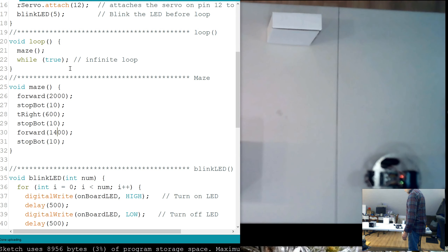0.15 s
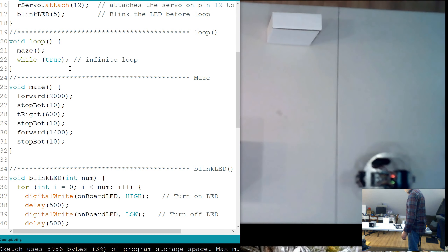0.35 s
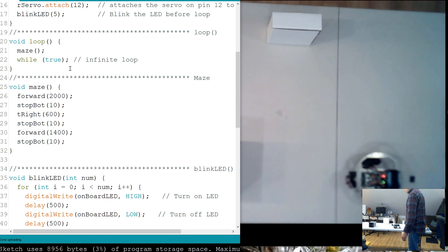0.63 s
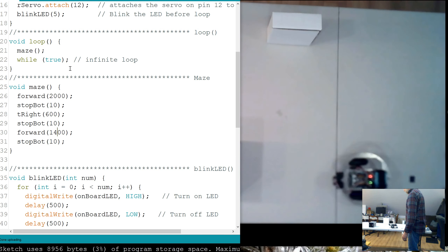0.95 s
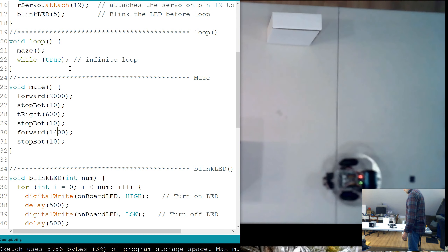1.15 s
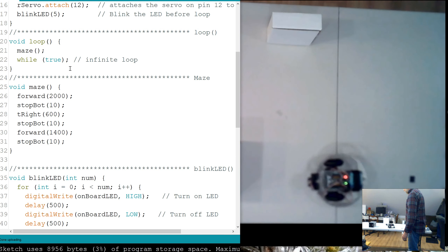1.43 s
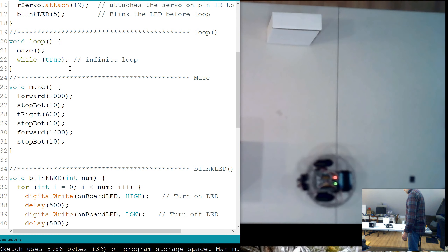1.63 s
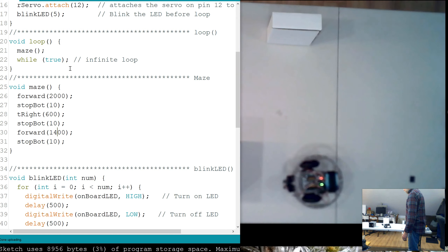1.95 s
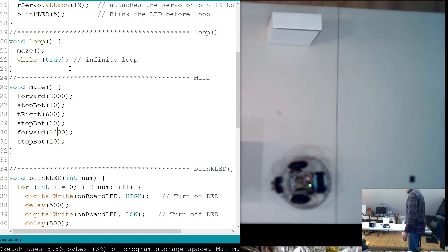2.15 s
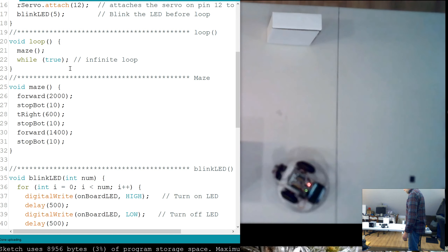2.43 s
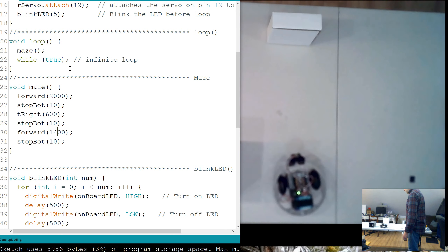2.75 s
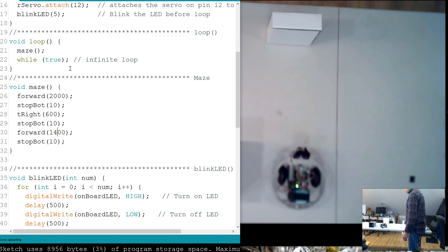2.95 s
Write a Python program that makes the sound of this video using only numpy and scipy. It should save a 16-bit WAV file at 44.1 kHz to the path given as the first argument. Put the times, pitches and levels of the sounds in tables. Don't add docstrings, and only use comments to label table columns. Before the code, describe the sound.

After a quiet moment, a small robot's servo motors start a buzzy, rattling whir, run steadily, dip briefly, then resume while turning. Soft low wheel thuds and faint squeaks lie underneath, in a quiet room, one microphone.

```python
import sys
import numpy as np
from scipy import signal
from scipy.fft import rfft, irfft
from scipy.io import wavfile
from scipy.ndimage import uniform_filter1d

SR = 44100
rng = np.random.default_rng(int(sys.argv[2]) if len(sys.argv) > 2 else 0)


def volts_from_decibels(level):
    exponent = np.asarray(level, float) / 20
    return 10 ** exponent


def persist_wave(psi):
    counts = np.round(np.clip(psi, -1, 1) * 32767).astype(np.int16)
    wavfile.write(sys.argv[1], SR, np.atleast_2d(counts).T)


N = 136710
TIME = np.arange(N) / SR


def evened(x):
    return x / np.sqrt(np.mean(x ** 2) + 1e-20)


def steady(x, size=2000):
    x = evened(x)
    power = abs(uniform_filter1d(x ** 2, size)) + .02
    return evened(x / power ** (0.72 / 2))


def curve(rows, col):
    rows = np.array(rows)
    return np.interp(TIME, rows[:, 0], rows[:, col])


def gate(start, length, rise, fall):
    t = TIME - start
    return np.clip(t / rise, 0, 1) * np.exp(-np.maximum(t - length, 0) / fall)


def slow(rate_hz):
    size = max(int(SR / rate_hz), 2)
    noise = rng.standard_normal(N)
    return evened(uniform_filter1d(uniform_filter1d(noise, size), size))


def clicks(per_s, spread_db):
    size = volts_from_decibels(spread_db * np.minimum(rng.exponential(1, N), 5)) * rng.choice([-1., 1.], N)
    return evened(size * (rng.random(N) < per_s / SR))


def colour(x, points):
    f, db = np.transpose(points)
    hz = np.fft.rfftfreq(N, 1 / SR) + 1
    gain_db = np.interp(np.log(hz), np.log(f), db, left=db[0] - 11, right=db[-1] - 1)
    return irfft(rfft(x) * volts_from_decibels(gain_db), N)


def ring(x, hz, width):
    r = np.exp(-np.pi * width / SR)
    poles = [1, -2 * r * np.cos(2 * np.pi * hz / SR), r * r]
    return signal.lfilter([1, 0, -1], poles, x) * np.sqrt((1 - r * r) / 2)


# (time [s], level [dB], brightness [dB], sizzle [dB])
DRIVE = [(.255, -83.5, 1, -1), (.29, -58.5, -1, 2), (.33, -47, -7, 0.5), (.42, -45.5, -1.5, 4.5),
         (.68, -44, -1, 0), (1.0, -44.5, -4, -0.5), (1.3, -47, -2.5, 0.5), (1.65, -46.5, 1, -2.5),
         (2.04, -45.5, -2, 0.5), (2.265, -47.5, -3, 2), (2.3, -58.5, -7, 3), (2.33, -48.5, -6, 1),
         (2.43, -45, -3.5, 3.5), (2.75, -48.5, -3, 4), (2.87, -45.5, -4, 2), (2.905, -50.5, 3, 0),
         (2.94, -47.5, 3, -2), (3.1, -46.5, -5.5, 3.5)]
# (start [s], length [s], lift [dB])
SURGES = [
    (0.647, 0.032, 2),
    (0.974, .06, 0.5),
    (1.437, 0.025, 2),
    (1.685, .07, 1.5),
    (1.997, 0.02, 2.5),
    (2.087, .02, 2.5),
]


def servos():
    switched_on = gate(DRIVE[0][0], N, 0.0075, 1)
    surge_db = sum(db * gate(start, length, .01, 0.007) for start, length, db in SURGES)
    effort = switched_on * volts_from_decibels(curve(DRIVE, 1) + surge_db - 4.0)
    return effort * (rattle() + whine(NEAR_MOTOR, 1) + whine(FAR_MOTOR, 2) + gearbox())


# (frequency [Hz], density [dB per Hz])
CASE = [(3900, -45), (4850, -14), (5750, 0.5), (6250, 4.5), (9000, 4.5), (11200, 8.5), (12300, -1.5),
        (15300, -13.5)]
# (frequency [Hz], level [dB])
CASE_MODES = [(5080, -19), (5310, -15.5), (6630, -15.5), (7410, -34), (7660, -16), (8180, -11.5),
              (9500, -10.5), (9800, -12.5), (10100, -10), (10450, -7.5), (10800, -14.5), (11200, -16.5),
              (14000, -30)]


def rattle():
    ticks = clicks(12000, 2.5)
    modes = sum(volts_from_decibels(db + 2.2 * slow(14)) * ring(ticks, hz, 70) for hz, db in CASE_MODES)
    case = volts_from_decibels(-1) * evened(colour(ticks, CASE)) + volts_from_decibels(-4.5) * modes
    hz, t, z = signal.stft(case, SR, nperseg=1024, noverlap=768)
    hz = hz[:, None]

    patches = uniform_filter1d(rng.standard_normal(z.shape), 2, 0)
    patches = evened(uniform_filter1d(patches, 22, 1))

    low_edge_hz, pivot_hz, sizzle_hz = 5300, 8300, 12300
    under_db = 4 / (1 + (hz / low_edge_hz) ** 60)
    slope = np.minimum(np.tanh(2 * np.log2((hz + 1) / pivot_hz)), .4) * (hz > low_edge_hz)
    tilt_db = slope * np.interp(t, TIME, curve(DRIVE, 2))
    sizzle_db = np.interp(t, TIME, curve(DRIVE, 3)) / (1 + (sizzle_hz / (hz + 1)) ** 16)

    gain = volts_from_decibels(2.5 * patches + tilt_db + sizzle_db - under_db)
    return signal.istft(z * gain, nperseg=1024, noverlap=768)[1][:N]


# (time [s], tooth mesh [Hz], whine [dB])
NEAR_MOTOR = [(.3, 1978, 1), (.44, 2000, 11), (.5, 2089, 6.5), (.57, 2120, 7.5), (.78, 2112, -2),
              (.9, 2175, -14), (1.8, 2190, -5), (2.0, 2187, 2.5), (2.28, 2195, 1), (2.33, 1694, 1.5),
              (2.41, 2090, 3), (2.6, 2150, -3), (2.85, 2233, 5.5), (2.89, 2215, 6), (2.91, 2026, -21),
              (2.95, 2060, 7.5), (3.1, 2140, -25)]
# (time [s], tooth mesh [Hz], whine [dB])
FAR_MOTOR = [
    (.28, 2010, -4),
    (.42, 2205, -12.5),
    (1.2, 2225, -3),
    (1.45, 2210, 2.5),
    (2.28, 2204, 2.5),
    (2.32, 1904, -10),
    (2.42, 2202, 3),
    (2.6, 2290, 5),
    (2.9, 2287, -5),
    (3.1, 2240, -10),
]
# (multiple, near motor [dB], far motor [dB])
OVERTONES = [(6, -26, -28), (3, -13, -11), (4, -10, -17), (5, -9, -18)]


def whine(motor, level_col):
    pinion_teeth, wander_hz, wobble_rad = 12, 10, .14
    cycles = np.cumsum(curve(motor, 1) + wander_hz * slow(57.96)) / SR
    wobble = wobble_rad * np.sin(2 * np.pi * cycles / pinion_teeth)
    out = 0
    for row in OVERTONES:
        level = volts_from_decibels(row[level_col] + 4 * slow(45))
        phase = row[0] * (2 * np.pi * cycles + wobble) + .8 * slow(150)
        out = out + level * np.sin(phase)
    return volts_from_decibels(curve(motor, 2)) * out


def gearbox():
    hz, width_hz, level_db = 2970, 600, -36.5
    noise = rng.standard_normal(N)
    return volts_from_decibels(level_db) * evened(ring(ring(noise, hz, width_hz), hz, width_hz))


def wheels():
    grit = clicks(1500, 1.0)
    roll = volts_from_decibels(curve(DRIVE, 1) - 30 + 2.4 * slow(3.3))
    floor = thuds(roll) + booms(grit) + scuffs(grit, roll)
    return floor + squeaks() + knock() + turning_rub(grit)


# (start [s], length [s], thud [dB], scuff [dB], scuff pitch [Hz])
BUMPS = [(0.345, 0.024, -65, -80, 200), (0.385, 0.099, -46, -90, 245), (0.53, 0.046, -79, -61.5, 387),
         (0.613, 0.065, -56.5, -71, 320), (0.727, 0.13, -59.5, -73, 470), (0.894, 0.11, -64, -81, 248),
         (1.074, 0.042, -63, -70.5, 181), (1.234, 0.071, -71, -65.5, 500), (1.307, 0.034, -61, -68, 252),
         (1.535, 0.04, -95, -66, 395), (1.601, 0.048, -66.5, -91, 199), (1.694, 0.075, -77, -62.5, 329),
         (1.765, 0.055, -65, -80, 200), (1.805, 0.19, -70, -67, 427), (1.965, 0.033, -69, -63, 953),
         (1.995, 0.015, -67, -52.5, 414), (1.996, 0.033, -80, -58.5, 940), (2.017, 0.084, -60, -58.5, 431),
         (2.327, 0.091, -57.5, -56, 384), (2.432, 0.055, -57, -55, 350), (2.471, 0.092, -85, -62.5, 700),
         (2.504, 0.046, -57, -54.5, 370), (2.765, 0.07, -58, -71, 280), (2.836, 0.054, -51.5, -75, 280),
         (2.93, 0.11, -62, -94, 250)]
BUMP_RISE_S, BUMP_FALL_S = 0.017, 0.019
# (frequency [Hz], width [Hz], level [dB])
PANEL = [(35, 8.6, -14), (68.6, 46, -22.5), (138.5, 14.1, -2), (181, 26.2, -9), (245, 38, -12.5)]


def thuds(roll):
    jolts = clicks(400, 0.8)
    push = roll
    for start, length, thud_db, _, _ in BUMPS:
        push = push + volts_from_decibels(thud_db) * gate(start, length, BUMP_RISE_S, BUMP_FALL_S)
    out = 0
    for hz, width, db in PANEL:
        mode = ring(ring(ring(jolts, hz, width), hz, 2 * width), hz, 4 * width)
        out = out + volts_from_decibels(db) * steady(mode)
    return push * out


# (start [s], length [s], level [dB])
BOOMS = [(0.335, 0.06, -68), (0.393, 0.028, -50.5), (.45, 0.034, -58), (0.563, 0.2, -72),
         (0.742, 0.092, -66), (.88, 0.041, -68), (1.072, 0.11, -65), (1.32, 0.034, -66.5),
         (1.413, 0.087, -77), (1.602, 0.23, -66.5), (1.975, .08, -71), (2.32, 0.15, -76),
         (2.777, 0.064, -67)]


def booms(grit):
    hz, width_hz = 75.5, 20
    swell = sum(volts_from_decibels(db) * gate(start, length, BUMP_RISE_S, 0.021) for start, length, db in BOOMS)
    return swell * steady(ring(ring(grit, hz, width_hz), hz, width_hz))


# (frequency [Hz], level [dB])
SCUFF_MODES = [(180, -1), (230, 8), (328, 4.5), (425, 3.5), (540, 0.5), (700, 2), (850, -5), (1000, -6)]


def scuffs(grit, roll):
    shapes = [gate(bump[0], bump[1], BUMP_RISE_S, BUMP_FALL_S) for bump in BUMPS]
    out = 0
    for hz, db in SCUFF_MODES:
        width = 18 + 0.05 * hz
        rub = volts_from_decibels(-11.0) * roll
        for (_, _, _, scuff_db, pitch_hz), shape in zip(BUMPS, shapes):
            distance = np.log2(hz / pitch_hz) / .45
            rub = rub + volts_from_decibels(scuff_db - 6.5 * distance ** 2) * shape
        out = out + volts_from_decibels(db - 8) * rub * steady(ring(ring(grit, hz, width), hz, 0.98 * width))
    return out


# (start [s], length [s], level [dB], pitch [Hz])
SQUEAKS = [(0.341, 0.041, -74, 4030), (0.474, 0.12, -79.5, 2183), (0.622, 0.16, -74, 2143),
           (0.467, 0.31, -77.5, 4220), (0.809, 0.12, -70.5, 4330), (1.7, 0.076, -76.5, 4370),
           (1.09, 0.095, -81, 2170), (1.282, 0.09, -81, 2230), (1.43, 0.044, -80, 2220),
           (1.442, 0.022, -67, 4400), (1.843, .19, -71.5, 4340), (2.13, 0.14, -75.5, 4380),
           (1.85, .05, -81, 2150), (0.309, 0.068, -79.5, 3120), (2.265, 0.023, -75, 2750),
           (2.323, 0.072, -78, 3280), (2.345, 0.046, -72, 4230), (2.405, 0.06, -65.5, 4340),
           (2.492, .09, -86, 3900), (2.53, 0.075, -77, 2160), (2.4, 0.1, -73, 2150),
           (2.925, 0.048, -79.5, 2043), (2.927, 0.073, -78, 4170)]


def squeaks():
    out = 0
    for start, length, db, hz in SQUEAKS:
        width = 46.3 * (hz / 2000) ** 0.73
        tone = ring(ring(rng.standard_normal(N), hz, width), hz, 2 * width)
        out = out + volts_from_decibels(db) * gate(start, length, 0.0067, 0.027) * steady(tone, size=2600)
    return out


def knock():
    time_s, level_db, hz, width_hz = 2.48, -54.5, 841, 250
    blow = (np.arange(N) == round(time_s * SR)).astype(float)
    return volts_from_decibels(level_db + 27.5) * ring(blow, hz, width_hz)


def turning_rub(grit):
    start_s, length_s, level_db, hz, width_hz = 2.5, .34, -77, 2600, 550
    rub = evened(ring(ring(grit, hz, width_hz), hz, width_hz))
    return volts_from_decibels(level_db + 4.5 * slow(27)) * gate(start_s, length_s, 0.031, 0.079) * rub


# (frequency [Hz], width [Hz], level [dB])
HUM = [(239.3, 4.8, -79.5), (525.3, 7.6, -87)]
# (time [s], level [dB])
LOAD = [(0, -80), (.25, -74), (.62, -87.5), (.85, -75.5), (1.1, -90), (1.5, -76.5), (1.85, -88.5),
        (2.5, -81.5), (2.65, -66), (2.9, -87.5), (3.1, -76)]


def distant_machine():
    out = 0
    for hz, width, db in HUM:
        band = evened(ring(ring(rng.standard_normal(N), hz, width), hz, width))
        out = out + volts_from_decibels(db + 2 * slow(2.0)) * band
    tone = np.sin(2 * np.pi * np.cumsum(1058 + 7 * slow(40)) / SR)
    return out + tone * volts_from_decibels(curve(LOAD, 1) + 0.5 + 3.8 * slow(11))


# (frequency [Hz], density [dB per Hz])
AIR = [(15, -20), (25, 0), (246, -1.5), (349, -4), (537, -3), (741, -8), (1080, -7), (1270, -13.5),
       (15500, -36.5)]


def room_air():
    return volts_from_decibels(-73.5 + 0.5) * evened(colour(rng.standard_normal(N), AIR))


def scene():
    return np.tile(servos() + wheels() + distant_machine() + room_air(), (2, 1))


# (low [Hz], high [Hz], share of the time [%])
WEAK_BANDS = [(3600, 3850, 4), (14600, 14950, 25), (14950, 15350, 50), (15350, 15750, 55)]
# (start [s], length [s], low [Hz], high [Hz])
SILENT_GAPS = [(.325, .04, 4250, 4700), (.35, .11, 4450, 4900), (.49, .19, 4500, 4900), (.68, .13, 4500, 4700),
               (.85, .1, 3700, 3850), (1.0, .14, 4300, 4650), (1.19, .03, 4500, 4700), (1.35, .05, 4350, 4700),
               (1.46, .09, 4600, 4850), (1.57, .07, 4400, 4650), (1.68, .1, 4500, 4700), (1.83, .12, 4500, 4700),
               (1.93, .11, 4500, 4900), (2.06, .06, 4500, 4750), (2.15, .12, 4650, 4800), (2.27, .1, 4500, 4700),
               (2.37, .31, 4550, 4900), (2.41, .08, 3500, 3900), (2.72, .23, 4300, 4600),
               (2.74, .12, 4600, 4900), (2.86, .22, 4700, 4850), (3.06, .03, 4300, 4850)]


def silence_bands(x):
    hz, t, z = signal.stft(x, SR, nperseg=1024, noverlap=768)
    power = uniform_filter1d(abs(z) ** 2, size=7, axis=1) + 1e-20
    total = power.sum(0)
    loud = total > total.max() / 100
    keep = np.ones(z.shape)
    for lo_hz, hi_hz, share in WEAK_BANDS:
        band = (hz > lo_hz) & (hz <= hi_hz)
        chance_db = 8 * np.interp(t, TIME, slow(14))
        part = power[band].sum(0) / total * volts_from_decibels(chance_db)
        weak = loud & (part < np.percentile(part[loud], share))
        keep[band] = np.where(weak, .01, 1)
    for start, length, lo_hz, hi_hz in SILENT_GAPS:
        band = (hz > lo_hz) & (hz <= hi_hz)
        keep[np.ix_(band, (t > start) & (t < start + length))] = .01
    return signal.istft(z * keep, nperseg=1024, noverlap=768)[1][:N]


def roll_off(x):
    return signal.sosfilt(signal.butter(12, 15640, fs=SR, output="sos"), x)


def record(dry):
    mix = np.tile(silence_bands(dry[0]), (2, 1))
    return roll_off(mix)


dry = scene()
out = record(dry)
persist_wave(out)
```